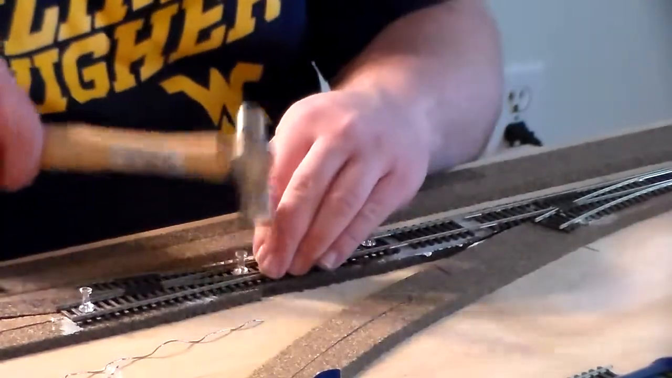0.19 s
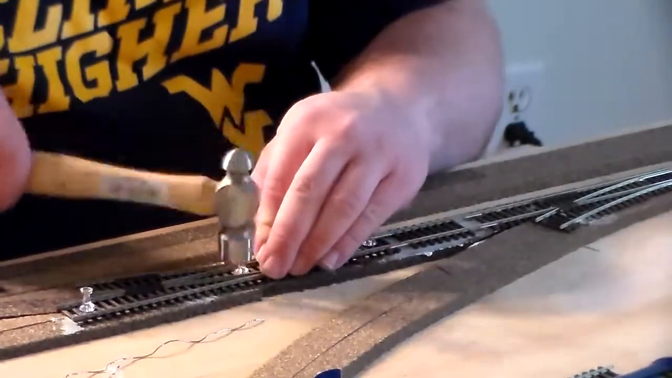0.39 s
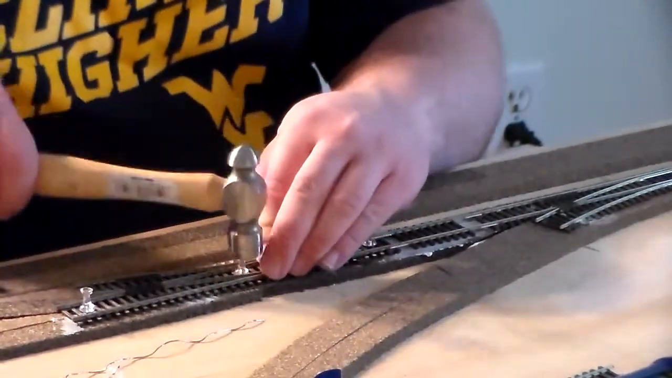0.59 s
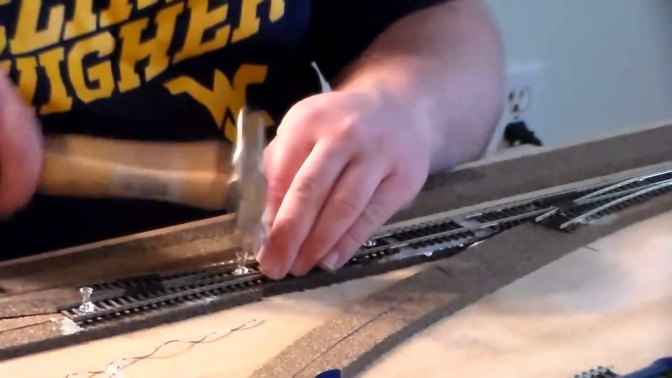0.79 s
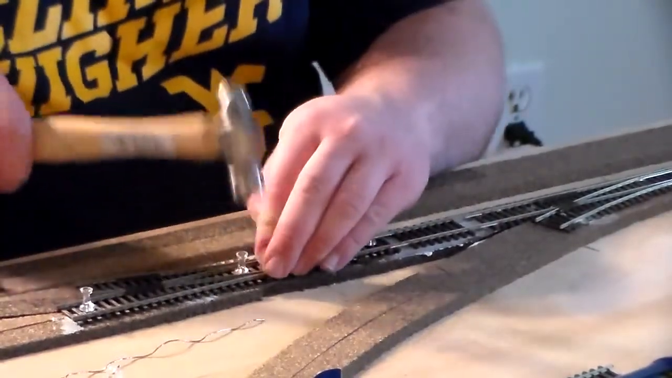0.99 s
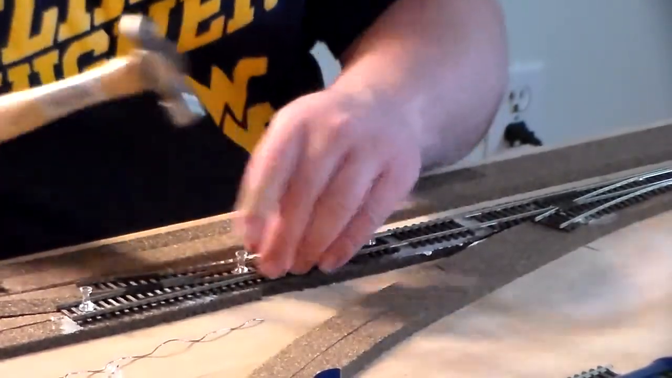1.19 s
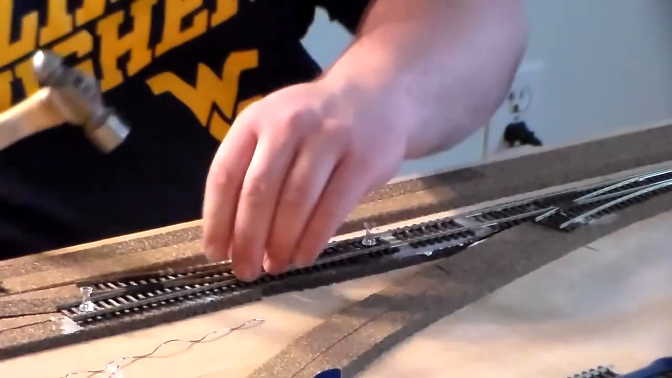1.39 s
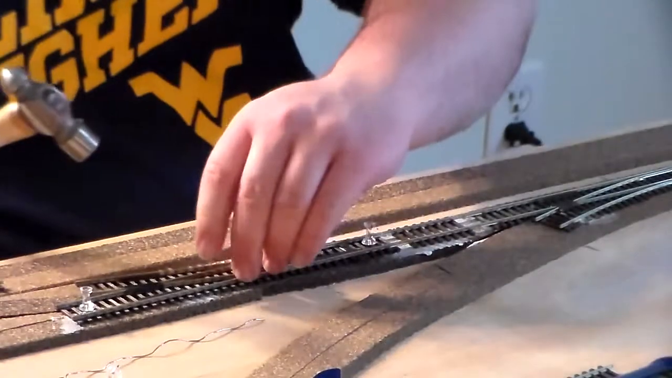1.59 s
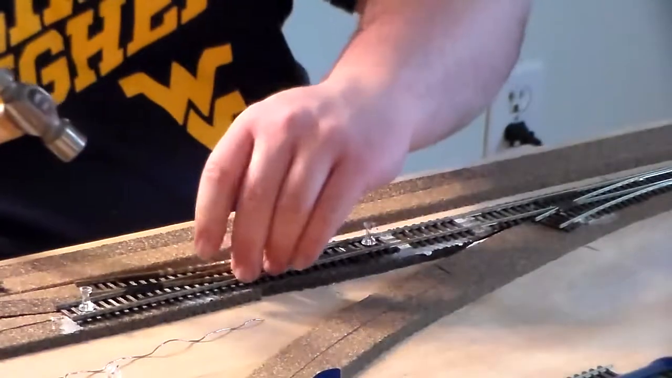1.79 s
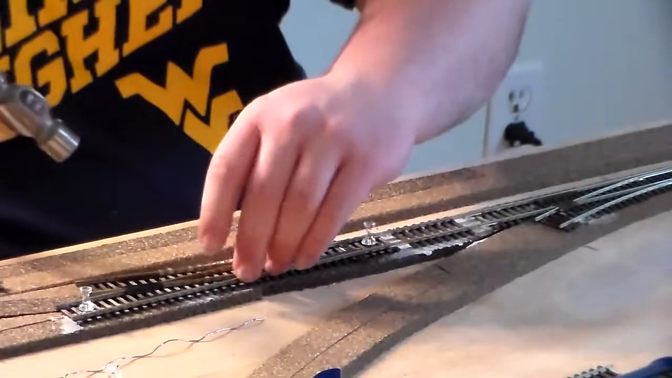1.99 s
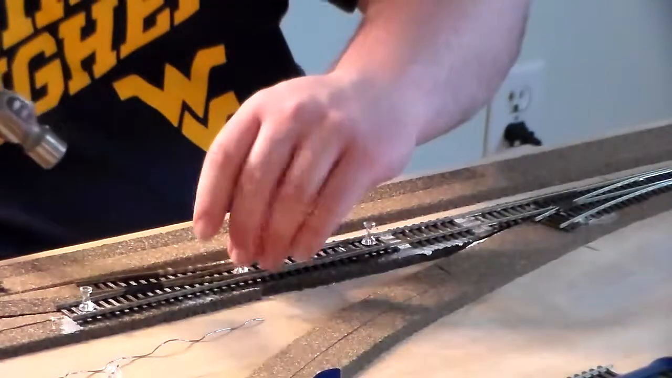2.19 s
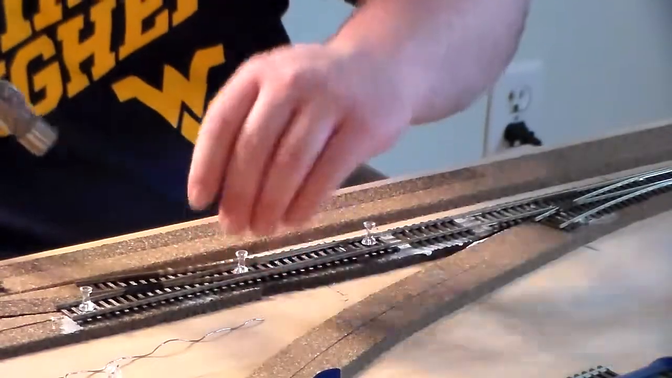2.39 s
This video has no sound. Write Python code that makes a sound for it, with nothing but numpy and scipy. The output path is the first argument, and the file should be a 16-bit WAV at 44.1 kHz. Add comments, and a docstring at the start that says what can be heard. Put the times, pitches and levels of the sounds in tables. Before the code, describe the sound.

A small hammer strikes a push pin into cork on a wooden table at about 0.25, 0.5, 0.75 and 0.98 seconds, the second a softer double click. Each gives a bright steel tick, brief rattle and hollow woody knock with short small-room reverberation. The level ducks and swells around the taps. Fingers scuff lightly near 1.2, faint hand rubbing follows until 1.8, over low hum, rumble and slight hiss.

```python
"""A small hammer taps a push pin into cork on a wooden table four times, in a small room. Each tap layers sine
ticks of steel, noise for rattle and crunching cork and ringing table modes; a low thud, as the hand bumps the
table, is strong on the last tap. Echoes, diffuse noise tails and standing waves give the room; the level drops
and swells through the taps. Then the fingers let go with small noise scuffs, and the hand slides faintly.
Wavering hum sines and shaped room noise run underneath, with a little hiss on top."""
import sys
import numpy as np
from scipy import signal
from scipy.fft import rfft, irfft
from scipy.io import wavfile
from scipy.ndimage import uniform_filter1d

SR = 44100
rng = np.random.default_rng(int(sys.argv[2]) if len(sys.argv) > 2 else 0)


def dump_mix(stems):
    """Bounce the given channels to the path in sys.argv[1] as a 16-bit WAV at rate SR."""
    frames = np.atleast_2d(stems).T  # one column per channel
    limited = np.clip(frames, -1, 1)  # hard clip at full scale
    pcm = np.round(limited * 32767).astype(np.int16)
    wavfile.write(sys.argv[1], SR, pcm)


N = 105840  # length in samples


def amp(db):
    """Turns decibels into gain."""
    return 10 ** (np.asarray(db) / 20)


def evened(x):
    """Scales a signal to rms 1."""
    return x / np.sqrt(np.mean(x ** 2) + 1e-20)


def read(points, hz):
    """Reads a curve on a log-frequency axis."""
    f, value = np.transpose(points)
    return np.interp(np.log(hz + 1), np.log(f + 1), value)


def add(mix, start_s, sound):
    """Mixes a sound in at its start time, cut at the end of the mix."""
    part = mix[..., max(round(start_s * SR), 0):][..., :sound.shape[-1]]
    part += sound[..., :part.shape[-1]]


def pan(db):
    """Gives left and right gains that differ by db, left minus right."""
    return amp(np.array([[db], [-db]]) / 2)


def puff(t, rise_s):
    """Swells to 1 at the rise time and dies away."""
    return t / rise_s * np.exp(1 - t / rise_s)


def dying(t, t60):
    """Decays exponentially, by 60 dB in t60 seconds."""
    return np.exp(-np.log(1000) * t / t60)


def noise(spectrum, size):
    """Shapes white noise to a spectrum, at rms 1."""
    hz = np.fft.rfftfreq(size, 1 / SR)
    bins = rfft(rng.standard_normal(size)) * amp(read(spectrum, hz))
    return evened(irfft(bins, size))


def wide_noise(spectrum, same, size):
    """Blends mid and side noise so left and right are as alike as the table says in each band."""
    likeness = np.clip(read(same, np.fft.rfftfreq(size, 1 / SR)), -1, 1)
    mid = rfft(noise(spectrum, size)) * np.sqrt(1 + likeness)
    side = rfft(noise(spectrum, size)) * np.sqrt(1 - likeness)
    return evened(irfft(np.array([mid + side, mid - side]), size))


# Tone of the room's rumble and air. Each row: frequency in Hz, relative level in dB per Hz.
AIR_SPECTRUM = [(12, -26.5), (30, 2.5), (45, -6), (62, -6.5), (95, -12), (150, -15), (220, -17.5),
                (420, -18.5), (700, -27.5), (1500, -30.5), (4000, -35.5), (9000, -37.5), (14000, -38.5)]
# Stereo width of the air. Each row: frequency in Hz, left-right likeness (1 is mono).
AIR_LIKENESS = [(30, 0.85), (200, 0.78), (600, 0.63), (2000, 0.18), (6000, 0.073), (14000, 0.074)]


def room_air():
    """Rumble and air: steady noise, nearly mono in the bass and wide in the treble."""
    return amp(-52.5) * wide_noise(AIR_SPECTRUM, AIR_LIKENESS, N)


# Partials of the mains hum. Each row: frequency in Hz, rms level in dB before the waver.
HUM_PARTIALS = [(59.8, -61), (119.7, -56.5), (239.6, -65), (360, -70.5), (453, -70)]
HUM_WAVER = 0.15  # typical swing of each partial's amplitude, as a fraction


def mains_hum():
    """Mains hum: sines whose amplitudes drift slowly and independently."""
    t = np.arange(N) / SR
    knots = np.linspace(0, N / SR, num=20)
    hum = np.zeros(N)
    for hz, db in HUM_PARTIALS:
        drift = np.interp(t, knots, rng.standard_normal(len(knots)))
        sine = np.sqrt(2) * np.sin(2 * np.pi * (hz * t + rng.random()))
        hum += amp(db) * sine * (1 + HUM_WAVER * drift)
    return hum


# Reverberation time of the room. Each row: frequency in Hz, t60 in seconds.
ROOM_T60 = [(150, 0.49), (450, 0.36), (1000, 0.43), (3000, 0.43), (7000, 0.42), (14000, 0.27)]
# Stereo width of the reverberation. Each row: frequency in Hz, left-right likeness (1 is mono).
ROOM_LIKENESS = [(100, 1), (550, 0.95), (1200, 0.91), (4000, .72), (8000, 0.16), (14000, .25)]
# Build-up of the reverberation, slower in the bass. Each row: frequency in Hz, time constant in seconds.
ROOM_BUILD = [(150, 0.008), (600, 0.013), (1500, 0.0032), (14000, 0.003)]
PATCHY_DB = 2.3  # unevenness of the reverberation, standard deviation
TAIL_RISE_S = 0.0046  # overall softening of the onset


def room_tail(spectrum):
    """Diffuse sound: noise that builds up and dies unevenly, at its own speed in each band."""
    hz, t, bins = signal.stft(wide_noise(spectrum, ROOM_LIKENESS, SR), SR, nperseg=512)
    grain = uniform_filter1d(rng.standard_normal(bins.shape[1:]), size=6, axis=0)
    patches = evened(amp(PATCHY_DB * evened(grain)))
    build = 1 - np.exp(-(t / read(ROOM_BUILD, hz)[:, None]) ** 2)
    decay = dying(t, read(ROOM_T60, hz)[:, None])
    tail = signal.istft(bins * patches * build * decay, SR, nperseg=512)[1][:, :SR]
    return tail * (1 - np.exp(-np.arange(SR) / SR / TAIL_RISE_S))


# Standing waves that ring on. Each row: frequency in Hz, relative level in dB, t60 in seconds.
STANDING_WAVES = [(144.3, -28.5, 0.26), (161.9, -23.5, .36), (226, -35, 0.24), (297.6, -29.5, 0.19),
                  (364.4, -37, 0.35), (402.4, -18, 0.32), (434.5, -20.5, 0.29), (470, -25, 0.38),
                  (507, -23.5, 0.42), (557, -27.5, 0.39), (581, -36, 0.29), (654, -34.5, 0.47)]
STANDING_RISE_S = 0.015
STANDING_SCATTER_DB = 0.5  # no two blows land alike


def standing_waves(t):
    """Low room resonances: decaying sines, stirred a little differently by each blow."""
    ringing = np.zeros(len(t))
    for hz, db, t60 in STANDING_WAVES:
        blow_db = db + STANDING_SCATTER_DB * rng.standard_normal()
        ringing += amp(blow_db) * np.sin(2 * np.pi * (hz * t + rng.random())) * dying(t, t60)
    return (1 - np.exp(-t / STANDING_RISE_S)) * ringing


# Tone of a tap's reverberation. Each row: frequency in Hz, relative level in dB per Hz.
TAP_TAIL_SPECTRUM = [(60, -53), (110, -34), (160, -7.5), (230, -6.5), (310, -3.5), (420, -0.5), (540, 0.5),
                     (680, -7.5), (850, -14.5), (1300, -19), (2800, -19), (3800, -22), (4900, -30),
                     (5700, -30), (8000, -37), (12500, -36.5), (15000, -53)]
TAIL_CHANGE = 0.46  # share of fresh tail in each tap, 0 to 1


def tap_room(t, shared_tail):
    """The room's answer to a blow: a partly shared, partly fresh noise tail plus the standing waves."""
    fresh_tail = room_tail(TAP_TAIL_SPECTRUM)
    tail = np.sqrt(1 - TAIL_CHANGE ** 2) * shared_tail + TAIL_CHANGE * fresh_tail
    return amp(-13.5) * tail + standing_waves(t)


TREBLE_PAN_DB, BOOM_PAN_DB = -1.5, 1.55  # left minus right

# Fingers leaving the pin. Each row: start in seconds, relative level in dB, rise in seconds.
SCUFFS = [(1.1725, -42, 0.0018), (1.179, -43.5, 0.0025), (1.1834, -37, 0.0015)]
# Tone of the scuffs. Each row: frequency in Hz, relative level in dB.
SCUFF_SPECTRUM = [(200, -19), (900, 4), (2700, -0.5), (3500, 7.5), (4400, 1), (5500, -3.5), (9000, -7),
                  (14000, -10.5)]


def finger_scuffs():
    """Letting go of the pin: brief puffs of bright noise as skin rubs off it."""
    t = np.arange(SR) / SR
    scuffs = np.zeros(N)
    for start_s, db, rise_s in SCUFFS:
        add(scuffs, start_s, amp(db) * noise(SCUFF_SPECTRUM, SR) * puff(t, rise_s))
    return scuffs


# The hand shifting. Each row: centre in seconds, time from centre to 1/e in seconds,
# centre frequency in Hz, full width at half amplitude in Hz, relative level in dB.
SLIDES = [(1.36, 0.037, 3000, 3000, -66), (1.45, 0.4, 650, 600, -76), (1.70, 0.1, 2130, 503, -73),
          (1.772, 0.016, 1100, 989, -64)]


def hand_slides():
    """Faint rubbing: bands of noise that swell and fade as the hand shifts."""
    t, hz = np.arange(N) / SR, np.fft.rfftfreq(N, 1 / SR)
    slides = np.zeros(N)
    for centre_s, half_s, centre_hz, width_hz, db in SLIDES:
        band = 1 / (1 + (2 * (hz - centre_hz) / width_hz) ** 2)
        rub = evened(irfft(rfft(rng.standard_normal(N)) * band, N))
        slides += amp(db) * rub * np.exp(-((t - centre_s) / half_s) ** 2)
    return slides


def fingers():
    """Scuffs and slides, direct and spread through the room by convolution with a noise tail."""
    direct = finger_scuffs() + hand_slides()
    tail = room_tail([(100, 0), (14000, 0)])  # flat spectrum
    tail /= np.linalg.norm(tail[0])
    wet = signal.fftconvolve(direct[None], tail, axes=1)[:, :N]
    return pan(TREBLE_PAN_DB) * direct + amp(1) * wet


# Modes of the table top. Each row: frequency in Hz, relative level in dB, t60 in seconds.
TABLE_MODES = [(171.5, -25, 0.047), (310, -30, 0.1), (466.5, -7, 0.062), (533, -7.5, 0.073),
               (677, -31, .05)]
# Near surfaces throwing the boom back. Each row: delay in seconds, level against the direct boom in dB.
BOOM_ECHOES = [(.0055, -1.5), (.0078, -9.5), (.0101, -0.5), (.0157, -6.5), (.0218, -7), (.0271, -13.5),
               (.0298, -8)]
TABLE_LOW_HZ = 135  # the top radiates little bass below this
CONTACT_S = 0.00044  # the cork softens the blow


def table_boom(t):
    """Table top: struck modes ring as decaying sines and come back in early reflections."""
    direct = sum(amp(db) * np.sin(2 * np.pi * hz * t) * dying(t, t60) for hz, db, t60 in TABLE_MODES)
    direct = direct * (1 - np.exp(-t / CONTACT_S))
    low_cut = signal.butter(2, TABLE_LOW_HZ, "high", fs=SR, output="sos")
    for _ in range(2):
        direct = signal.sosfilt(low_cut, direct)
    boom = direct.copy()
    for delay_s, db in BOOM_ECHOES:
        add(boom, delay_s, amp(db) * direct)
    return boom


def hand_thud(t):
    """Deep thud of the hand bumping the table: a short puff of a low sine."""
    return puff(t, 0.0023) * np.sin(2 * np.pi * 63 * t)


# Tone of the rattling pin. Each row: frequency in Hz, relative level in dB.
RATTLE_SPECTRUM = [(300, -66), (900, -1.5), (1500, -3), (3000, -4.5), (4300, -8.5), (6000, -20),
                   (14000, -24.5)]


def pin_rattle(t):
    """Rattle of the pin: fast-dying noise."""
    return amp(-21.5) * noise(RATTLE_SPECTRUM, SR) * dying(t, 0.044)


# Tone of the crunching cork. Each row: frequency in Hz, relative level in dB.
CRUNCH_SPECTRUM = [(1000, -36.5), (5000, -13), (9000, -7.5), (12300, 7), (14500, 4.5)]


def cork_crunch(t):
    """Cork giving way: a very short puff of treble noise."""
    return wide_noise(CRUNCH_SPECTRUM, ROOM_LIKENESS, SR) * puff(t, 0.002)


def head_ring(t):
    """Hammer head: one thin, long-ringing sine."""
    return amp(-52) * np.sin(2 * np.pi * 5560 * t) * dying(t, 0.8)


# Steel on the pin, twice on the second tap.
# Each row: start in seconds, relative level in dB, pitch in Hz, rise in seconds.
TICKS = [(0.2466, -3, 4020, 0.00043), (0.5102, -12.5, 3900, 0.00048), (0.5133, -19, 3800, 0.00067),
         (0.7502, -6.5, 3580, 0.00035), (0.9767, -3, 3440, .00022)]
TICK_SHAPE = 2.1  # higher is a rounder, purer tick
TICK_ECHO_S, TICK_ECHO_DB = 0.0066, -23


def steel_ticks():
    """Steel meeting steel: tiny bursts of a high sine, each with one faint echo."""
    out, t = np.zeros((2, N)), np.arange(SR) / SR
    for start_s, db, hz, rise_s in TICKS:
        burst = puff(t, rise_s) ** TICK_SHAPE * np.sin(2 * np.pi * hz * t)
        tick = pan(TREBLE_PAN_DB) * amp(db) * burst
        add(out, start_s, tick)
        add(out, start_s + TICK_ECHO_S, amp(TICK_ECHO_DB) * tick)
    return out


# The four blows. Each row: start in seconds, relative level of boom and room in dB, low-pass cutoff of the boom
# in Hz, relative level of the cork crunch in dB, relative level of the hand's thud on the table in dB.
TAPS = [(0.2467, -3, 640, -37, -48), (0.5105, -2, 880, -25, -54), (0.7501, -.5, 950, -39, -54),
        (0.9764, -2, 1100, -37.5, -23)]


def hammer():
    """Each blow excites pin, cork, hammer head, table top and room at once; the hand bumping the table adds a
    low thud, strong only on the last tap."""
    out, t = steel_ticks(), np.arange(SR) / SR
    boom, shared_tail = table_boom(t), room_tail(TAP_TAIL_SPECTRUM)
    for start_s, boom_db, top_hz, crunch_db, thud_db in TAPS:
        knock = signal.sosfilt(signal.butter(3, top_hz, fs=SR, output="sos"), boom)
        treble = pin_rattle(t) + amp(crunch_db) * cork_crunch(t) + head_ring(t)
        add(out, start_s, pan(TREBLE_PAN_DB) * treble + amp(thud_db) * hand_thud(t))
        add(out, start_s, amp(boom_db) * (pan(BOOM_PAN_DB) * knock + tap_room(t, shared_tail)))
    return out


def scene():
    """Layers the background, the fingers and the hammer."""
    return room_air() + mains_hum() + fingers() + hammer()


# Level of the whole scene, moving through the taps. Each row: time in seconds, gain in dB.
LEVEL_CURVE = [(0.235, 1), (0.246, -7.5), (0.29, -6.5), (0.38, -12.5), (0.47, -17.5), (0.51, -9.5),
               (0.57, -7.5), (0.69, -15.5), (0.75, -11), (0.81, -5), (0.92, -2.5), (0.96, -3), (0.98, -8.5),
               (1.05, -2.5), (1.13, -0.5)]


def record(dry):
    """Rides the scene's level, adds steady microphone hiss and rolls off the top."""
    level_db = np.interp(np.arange(N) / SR, *np.transpose(LEVEL_CURVE))
    out = dry * amp(level_db) + amp(-68) * rng.standard_normal((2, N))
    low_pass = signal.firwin(255, 14400, window=("kaiser", 9), fs=SR)  # cutoff in Hz
    return signal.oaconvolve(out, low_pass[None], "same")


dry = scene()
out = record(dry)
dump_mix(out)
```